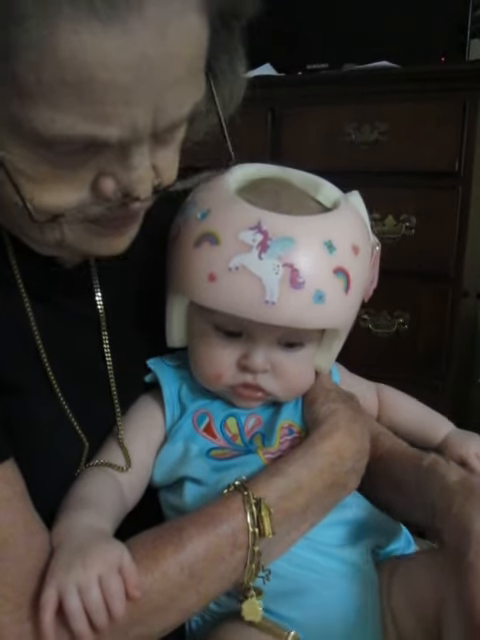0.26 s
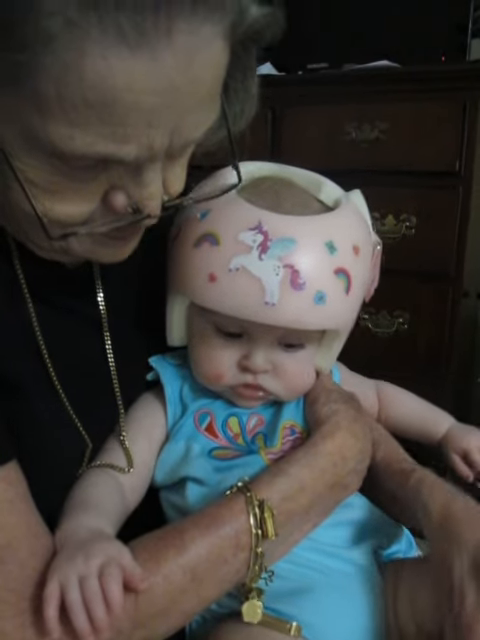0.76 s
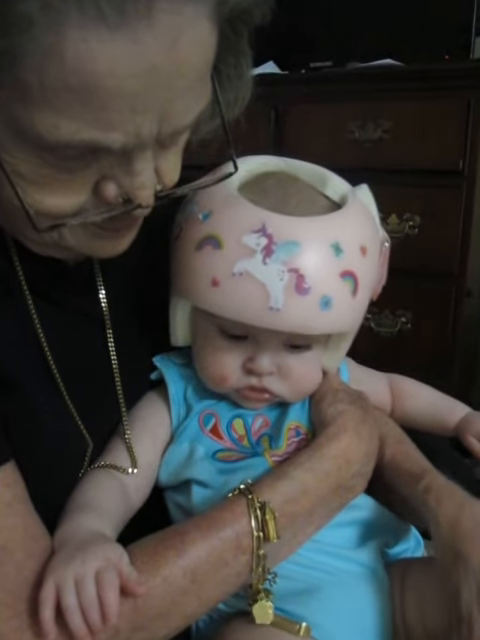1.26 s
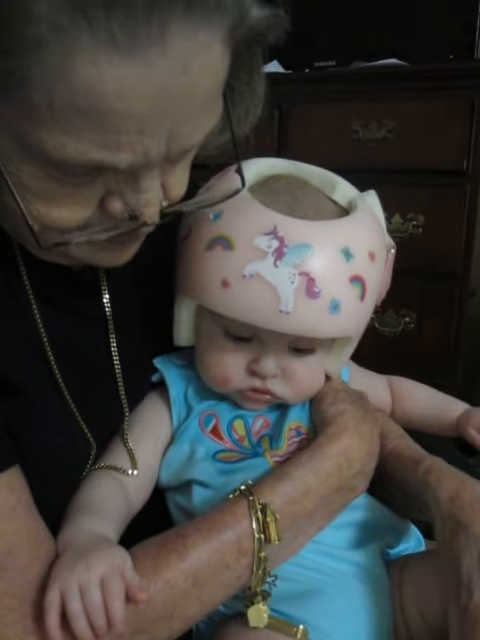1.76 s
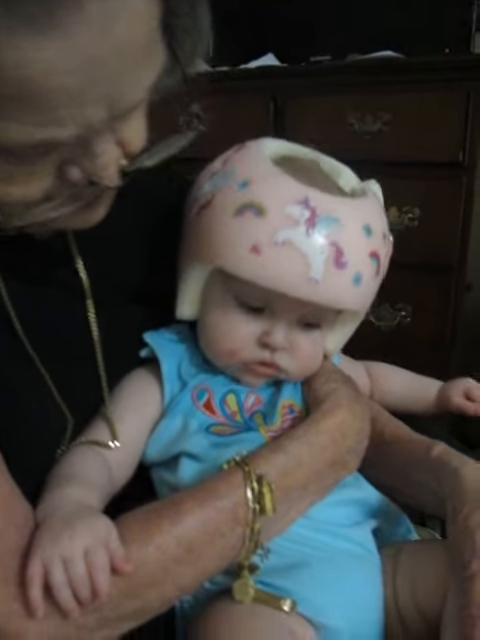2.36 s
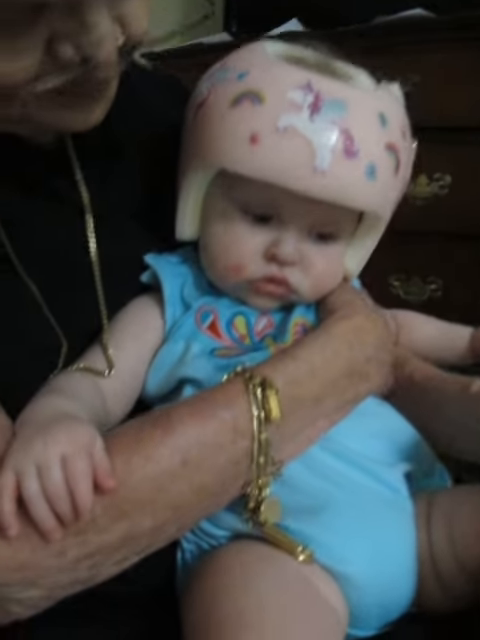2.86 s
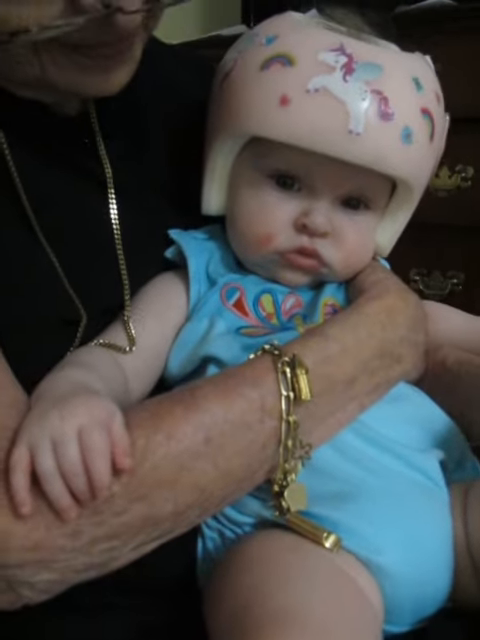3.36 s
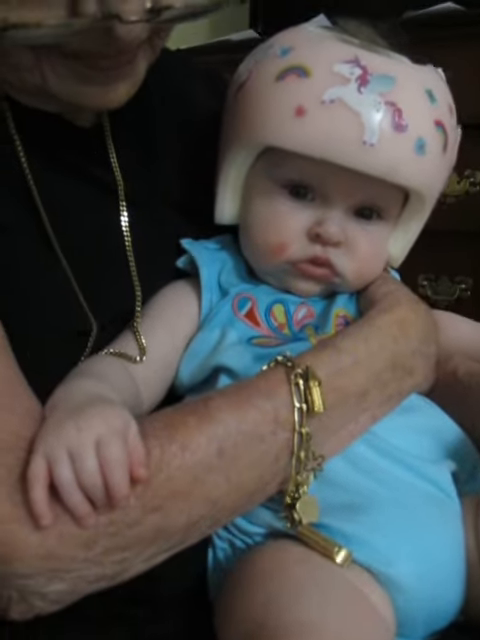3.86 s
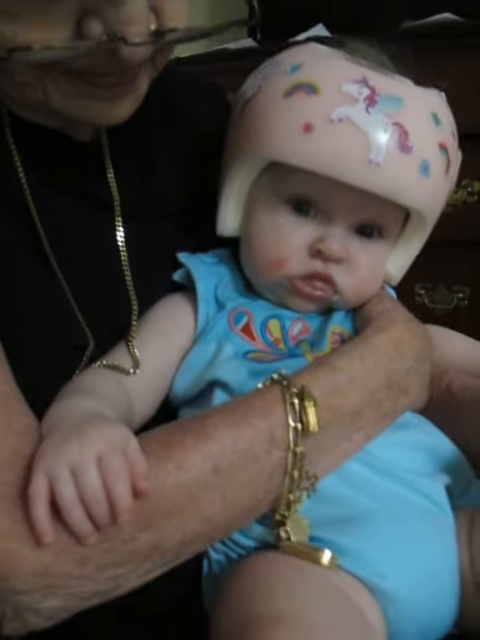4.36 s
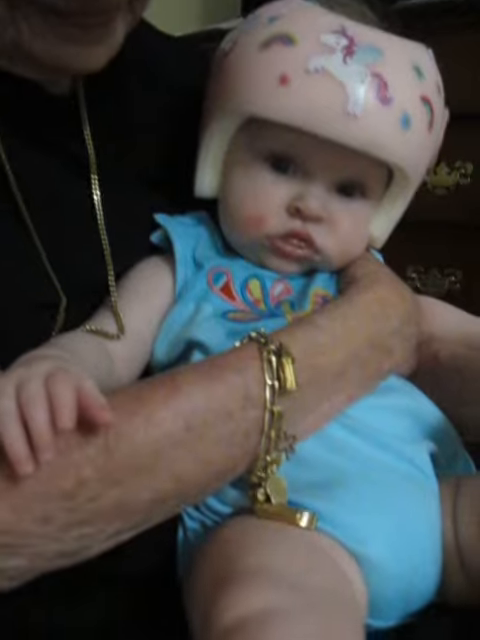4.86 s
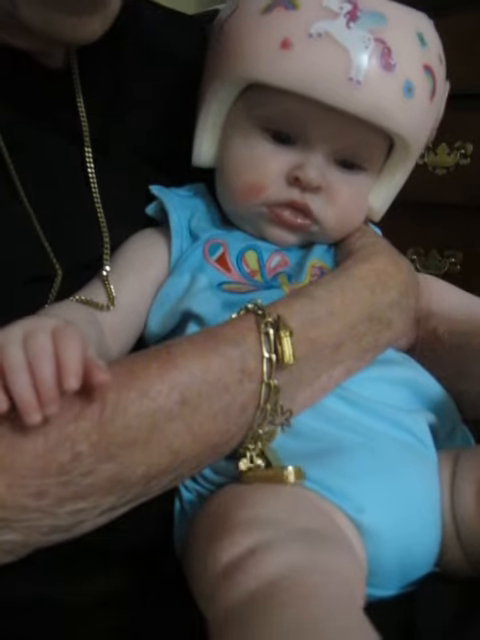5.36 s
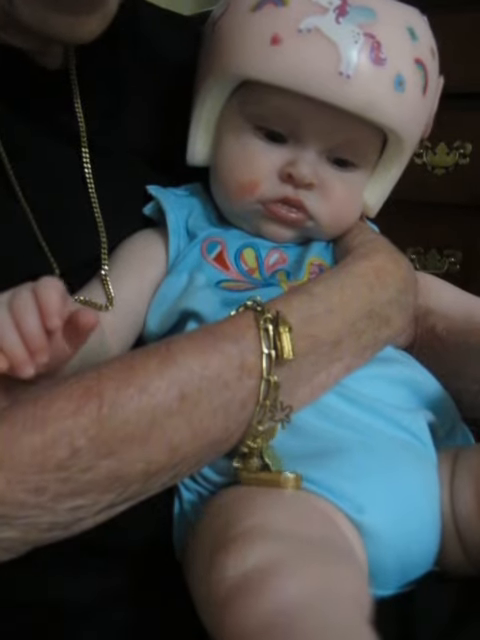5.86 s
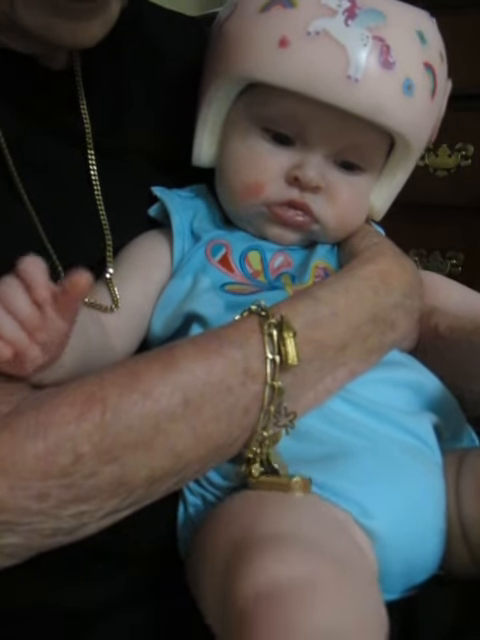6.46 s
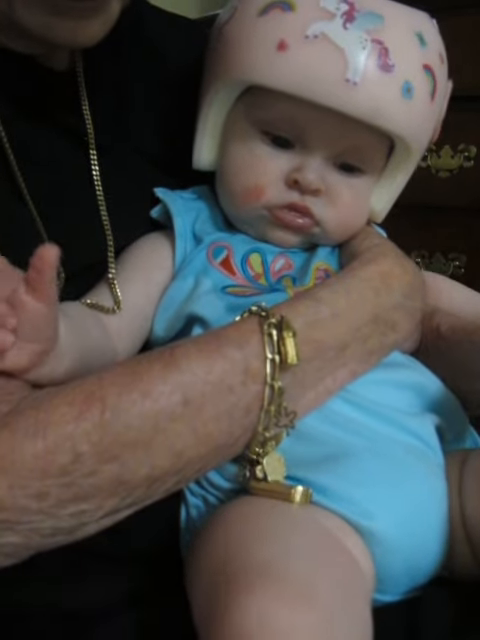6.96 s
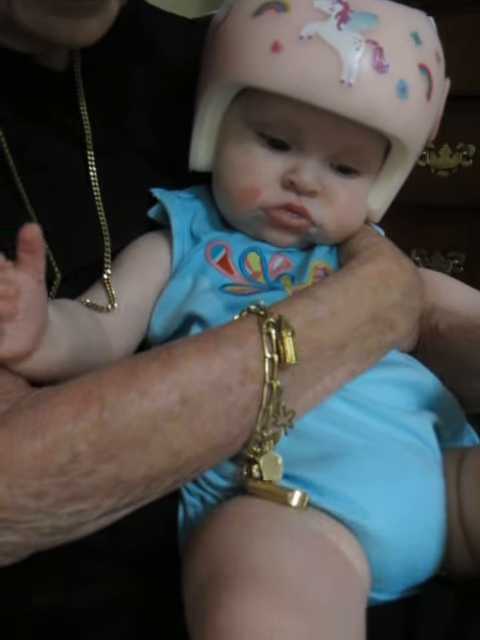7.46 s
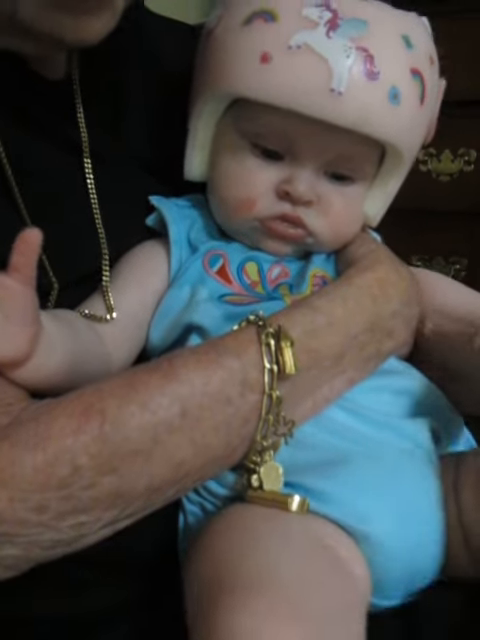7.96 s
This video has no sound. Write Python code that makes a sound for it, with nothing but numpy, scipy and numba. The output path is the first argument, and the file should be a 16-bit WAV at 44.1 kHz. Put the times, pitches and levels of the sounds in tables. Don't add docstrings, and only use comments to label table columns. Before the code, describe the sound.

Tiny metal bracelet charms clink and jingle in irregular bursts close to a handheld camera, over a steady low fan hum and faint motor whine.

```python
import sys
import numpy as np
from scipy import signal
from scipy.fft import rfft, irfft
from scipy.io import wavfile
from scipy.ndimage import uniform_filter1d
from numba import njit

SR = 44100
rng = np.random.default_rng(int(sys.argv[2]) if len(sys.argv) > 2 else 0)


def int16_out(signal):
    q = np.round(np.clip(np.atleast_2d(signal).T, -1, 1) * 32767)
    wavfile.write(sys.argv[1], SR, q.astype(np.int16))


def decibels_to_gain(level_db):
    exponent = np.asarray(level_db, float) / 20
    return 10 ** exponent


N = 361619


def level(x, db):
    return x * decibels_to_gain(db) / np.sqrt(np.mean(x ** 2))


def curve(s, values):
    return np.interp(np.arange(N) / SR, s, values)


def resonate(x, hz, width):
    return signal.lfilter(*signal.iirpeak(hz, hz / width, SR), x)


def band(hz, width):
    return level(resonate(rng.standard_normal(N), hz, width), 0)


def walk(rate):
    hold = int(SR / rate)
    steps = np.repeat(rng.standard_normal(N // hold + 1), hold)
    return 1.25 * uniform_filter1d(uniform_filter1d(steps, hold), hold)[:N]


def tone(hz, db, wobble, sway_db):
    phase = 2 * np.pi * hz * np.arange(N) / SR + wobble * walk(3) + rng.uniform(0, 2 * np.pi)
    return np.sqrt(2) * decibels_to_gain(db + sway_db * walk(4)) * np.sin(phase)


@njit
def ring(at, blow, pole, keep):
    out, z, p, k = np.zeros(N), 0j, 0j, 0
    for i in range(at[0], N):
        while k < len(at) and at[k] <= i:
            z, p, k = keep * z + blow[k], pole[k], k + 1
        out[i] = z.imag
        z = z * p if abs(z.real) + abs(z.imag) > 1e-9 else 0j
    return out


def strike(s, db, modes, t60=1., keep=.3, scatter_db=2., detune=.003, width=2000.):
    out, at = 0, (np.asarray(s) * SR).astype(np.int64)
    for hz, mode_db, factor in modes:
        pitch, strength, phase = rng.standard_normal((len(at), 3)).T
        decay = np.log(1000) / (factor * t60 * SR)
        pole = np.exp(2j * np.pi * hz * (1 + detune * pitch) / SR - decay)
        blow = decibels_to_gain(db + mode_db + scatter_db * strength) * np.exp(1j * phase)
        out = out + resonate(ring(at, blow, pole, float(np.clip(keep, 0, 1))), hz, width)
    return out


# pitch in Hz, level in dB per Hz.
AIR_COLOUR = [(45, -15), (75, -16), (100, -13.5), (290, -15.5), (400, -17.5), (700, -28), (1200, -32.5),
              (1750, -37.5), (3500, -38), (6000, -40), (9200, -39.5), (11500, -44), (14000, -61),
              (15800, -52)]


def air():
    hz, db = np.transpose(AIR_COLOUR)
    f = np.fft.rfftfreq(N, 1 / SR)
    shape = decibels_to_gain(np.interp(np.log(f + 1), np.log(hz), db))
    noise = irfft(rfft(rng.standard_normal(N)) * shape, N)
    upper = irfft(rfft(noise) * (f > 700), N)
    return noise * decibels_to_gain(-52.5 - 5.5) / upper.std()


# pitch in Hz, width in Hz, level in dB.
RIDGES = [(4970, 170, -70), (7070, 210, -74.5), (7300, 340, -82), (7930, 200, -79), (10240, 240, -66),
          (10740, 470, -76)]


def sensor():
    t, frame_hz = np.arange(N) / SR, 29.97
    beat = np.cos(2 * np.pi * frame_hz * t + 2.5 + .5 * walk(2))
    pulse = np.exp(1.25 * beat - .2 + .25 * walk(5))
    fade = decibels_to_gain(-.35 * t - 0.9)
    lines = decibels_to_gain(-73.5) * band(10190, 200.0) + decibels_to_gain(-72) * band(10050, 70.) + decibels_to_gain(-77) * band(10450, 60.)
    lines += decibels_to_gain(-76) * band(9915, 32.0) + decibels_to_gain(-72.5) * band(10255, 33.0) + decibels_to_gain(-88) * band(16000, 120.)
    ridges = sum(decibels_to_gain(db + walk(2.9)) * band(hz, width) for hz, width, db in RIDGES)
    return pulse * fade * lines + ridges


# multiple of the shaft speed, level in dB.
ORDERS_DB = [(2, -57), (5, -57), (6, -59.5), (8, -66.5), (9, -67.5), (10, -62), (11, -47.5), (12, -73.5),
             (14, -74)]
# pitch in Hz, level in dB.
DRONES = [(187, -53.5), (221, -54.5), (246, -54.5), (420, -68)]
# time in seconds, level in dB.
FAN_NEAR = [(0, -46.5), (2.3, -46), (3, -49), (5, -49.5), (8.2, -50.5)]
# time in seconds, level at half the shaft speed in dB, level at shaft speed in dB.
RUMBLE = [(0.0, -36.5, -54), (0.3, -42.5, -41), (2.31, -30, -42.5), (3.01, -37, -48.5), (3.11, -29, -63),
          (3.24, -40.5, -41), (4.5, -32, -41.5), (5.78, -37, -39.5), (6.17, -30, -51.5), (8.2, -37.5, -35)]


def fan():
    shaft_hz = 58.42
    near = curve(*np.transpose(FAN_NEAR))
    nearness = decibels_to_gain(near - near.mean())
    orders = sum(tone(k * shaft_hz, db, 0.45, 1.8 if k != 11 else .3) * nearness for k, db in ORDERS_DB)
    drones = sum(decibels_to_gain(db) * band(hz, 4.8) for hz, db in DRONES)
    s, half_db, first_db = np.transpose(RUMBLE)
    rumble = tone(shaft_hz / 2, 0, 1.3, 2.5) * decibels_to_gain(curve(s, half_db))
    rumble += tone(shaft_hz, 0, .5, 1.) * decibels_to_gain(curve(s, first_db))
    rumble += decibels_to_gain(-39.5) * band(12.7, 4.4) + decibels_to_gain(-38.5) * band(33.4, 2.66)
    rumble += decibels_to_gain(-48.5) * band(21.3, 7.2) + decibels_to_gain(-56.5) * band(39.7, 11.0)
    lull = np.sin(np.pi / 2 * np.minimum(np.arange(N, 0, -1) / (.012 * SR), 1))
    return orders + drones + rumble * lull


# pitch in Hz, level in dB.
WHINE = [
    [(1050, -82), (1120, -68.5), (1276, -66), (1314, -58.5), (1351, -61.5), (1389, -66), (1459, -66.5),
     (2476, -74.5), (2514, -78), (2552, -77), (2627, -76), (2745, -73), (2772, -75)],
    [(1120, -69.5), (1238, -63.5), (1276, -61.5), (1314, -60), (1351, -58), (1432, -69), (1459, -69),
     (2514, -76.5), (2552, -75), (2589, -75), (2783, -69), (2821, -73), (2859, -77), (2896, -74)],
    [(1357, -64), (1443, -69), (1480, -66.5), (1513, -64), (1620, -69), (2046, -74), (2799, -78),
     (2902, -77), (3149, -78), (3225, -69.5)],
]
# start in seconds, state number.
STATES = [(0, 2), (.09, 0), (2.42, 1), (5.1, 2), (5.24, 1), (5.4, 2), (5.47, 1), (5.55, 2), (5.76, 1),
          (6.47, 2), (6.53, 1), (6.59, 2), (6.84, 1), (7.02, 2), (7.27, 1), (7.86, 2)]
# pitch in Hz, width in Hz.
HISS_BANDS = [(1350, 300), (1600, 300), (1860, 80), (2050, 300), (2410, 130), (2810, 190), (3200, 180),
              (3720, 100), (4240, 110), (4800, 300), (5350, 400), (6450, 400), (3950, 200), (8800, 3500)]
# level in states 0, 1 and 2, all in dB.
HISS_DB = [(-63, -61, -62.5), (-84, -85, -66.5), (-75.5, -74, -79), (-81, -88, -91), (-84, -71.5, -100),
           (-69, -70.5, -69), (-100, -98, -67), (-71.5, -76.5, -77), (-70, -68, -72), (-81, -84, -68.5),
           (-73, -71.5, -87), (-84, -87, -67), (-76.5, -72, -93), (-96, -80, -62.5)]


def motor():
    t, motor_hz = np.arange(N) / SR, 36.85
    s, state = np.transpose(STATES)
    now = state[np.searchsorted(s, t, "right") - 1]
    share = [uniform_filter1d(1. * (now == k), size=4000) for k in range(3)]
    whine = sum(share[k] * tone(hz, db, 0.18 + 3.26 * (k == 2), 2.16)
                for k in range(3) for hz, db in WHINE[k])
    hiss = 0
    for (hz, width), levels_db in zip(HISS_BANDS, HISS_DB):
        noise = level(resonate(band(hz, width), hz, 2 * width), 0)
        loudness = sum(part * decibels_to_gain(db) for part, db in zip(share, levels_db))
        hiss = hiss + noise * decibels_to_gain(walk(3.05)) * loudness
    throb = 1 + .5 * np.cos(2 * np.pi * motor_hz * t)
    tick_times = np.arange(.018, N / SR, .2167)
    ticks = strike(tick_times, -49.5, [(574.4, .1, 0.19)], detune=0.008, width=180.0)
    return whine + throb * hiss + ticks


# start in seconds, level in dB, tilt in dB per octave (plus is brighter).
KNOCKS = [(2.4165, -44, -1), (2.4187, -31, 2), (2.4203, -32.5, 0.5), (2.4275, -45, 2), (2.7625, -48, -5),
          (2.916, -47, -3), (3.431, -51, -3), (3.971, -53, 7), (4.996, -50, -5), (5.549, -50, 3),
          (6.121, -52, 3), (6.722, -52, -7), (6.727, -50, -4), (7.81, -57, -7)]
# pitch in Hz, level in dB, ring time in seconds.
HOUSING_MODES = [(284, -6, 0.044), (520, 1, 0.029), (856, 7, 0.019), (1140, 4.5, 0.013), (1520, 3, 0.018),
                 (1880, 4, 0.011), (2370, 3.5, 0.019), (2880, -1, 0.015), (3370, -1, 0.0075),
                 (4700, -10, 0.0096), (5660, -10, .008), (7000, -19, .007)]


def knocks():
    s, db, tilt_db = np.transpose(KNOCKS)
    out = 0
    for hz, mode_db, t60 in HOUSING_MODES:
        late = .0009 * np.log2(5000 / hz)
        tilted_db = db + tilt_db * np.log2(hz / 1500)
        out = out + strike(s + late, tilted_db, [(hz, mode_db, t60)],
                           detune=0.019, scatter_db=0.5, width=1.04 * hz)
    return out


# middle in seconds, half length in seconds, rustle in dB, chatter in dB.
SHAKES = [(.2, .3, -69, -62), (2.12, 0.13, -67, -64), (4.404, 0.16, -68, -53), (4.727, 0.18, -64, -55),
          (5.037, 0.05, -55.5, -48), (5.263, 0.058, -55, -42), (5.847, 0.22, -65, -52),
          (6.169, 0.052, -56.5, -44), (6.381, .06, -58, -46), (6.75, 0.12, -61, -44),
          (7.822, 0.11, -66, -53), (8.067, 0.035, -71, -54)]


def rustle():
    size_db = 2.5 * np.minimum(rng.exponential(size=N), 3.5)
    grains = (rng.random(N) < 900 / SR) * decibels_to_gain(size_db)
    smear = signal.lfilter([1], [1, -.99], grains) * rng.standard_normal(N)
    colour = resonate(smear, 8000.0, 3300.0) + resonate(smear, 4500.0, 2500.)
    colour += decibels_to_gain(-22) * resonate(smear, 12000.0, 5000.)
    t, rest_db = np.arange(N) / SR, -65
    motion = decibels_to_gain(rest_db) + sum(decibels_to_gain(db) * np.exp(-((t - s) / half) ** 2) for s, half, db, _ in SHAKES)
    return level(colour, 0) * motion


def chatter(count):
    rows = [(s + half * (2 * u - 1), db - 8 * v)
            for s, half, _, db in SHAKES for u, v in rng.random((count, 2))]
    return np.clip(np.transpose(sorted(rows)), [[0], [-99]], [[N / SR], [0]])


def loose(modes, less_db):
    s, db = chatter(count=3)
    return strike(s, db + less_db, modes, detune=.004)


# start in seconds, level in dB.
SNAPS = [(.387, -56), (.4232, -43),  (.8925, -52), (1.2697, -54), (2.0305, -56), (2.791, -46),
         (4.0567, -52), (4.3447, -47), (4.5294, -44), (4.5528, -46), (4.7737, -43), (4.8496, -54),
         (4.9748, -54), (5.035, -52), (5.2, -48), (5.224, -37), (5.2473, -45), (5.2535, -47), (5.2577, -44),
         (5.2641, -42), (5.268, -48), (5.2723, -43), (5.2805, -42), (5.2875, -47), (5.309, -52),
         (5.347, -46), (5.371, -44), (5.44, -54), (5.5235, -50), (5.5964, -52), (5.775, -41), (5.7995, -51),
         (5.817, -49), (5.835, -51), (5.8428, -36), (5.851, -43), (5.8975, -54), (5.9212, -44), (5.99, -50),
         (6.201, -54), (6.3354, -43), (6.3445, -46), (6.36, -44), (6.3808, -47), (6.3855, -50),
         (6.3918, -42), (6.399, -47), (6.4085, -50), (6.4125, -49), (6.4175, -51), (6.462, -48),
         (6.5492, -41), (6.7019, -48), (6.7236, -50), (6.7302, -46), (6.7775, -50), (6.7828, -36),
         (6.7955, -43), (7.7946, -53), (8.0435, -46), (8.051, -53)]
# pitch in Hz, level in dB, ring time in seconds.
SNAP_MODES = [(4300, -3, .003), (5700, -9, .003), (9250, 9.5, .003), (11500, -3, .003), (13500, -5, .003),
              (15600, -7, .003)]


def chain_snaps():
    snaps = strike(*np.transpose(SNAPS), SNAP_MODES, detune=.03, width=4000.)
    return snaps + sum(loose(SNAP_MODES, -7) for _ in range(3))


# start in seconds, level in dB.
LINKS = [(0.181, -39), (0.2207, -36), (0.423, -34), (2.1212, -37), (4.3448, -36), (4.6383, -38),
         (4.7738, -38), (5.0159, -37), (5.186, -38), (5.1907, -36), (5.2091, -37), (5.2535, -32),
         (5.2863, -37), (5.767, -40), (5.8033, -34), (5.9211, -38), (6.3354, -27.5), (6.3491, -27),
         (6.356, -32), (6.3634, -37), (6.3808, -29), (6.5493, -37), (6.697, -41), (6.705, -36),
         (6.7236, -36), (6.8593, -36)]
# pitch in Hz, level in dB, ring time in seconds.
LINK_MODES = [(10940, -24, 0.023), (10250, -0.5, 0.0049), (10800, -13, 0.024)]


def chain_links():
    return strike(*np.transpose(LINKS), LINK_MODES, detune=.012) + loose(LINK_MODES, -2)


# start in seconds, level in dB.
BEADS = [
    [(0.4237, -37), (1.2702, -43), (2.0305, -54), (4.0567, -56), (4.3454, -45), (4.437, -54), (4.5295, -56),
     (4.5536, -47), (4.7741, -38), (4.8, -54), (4.975, -53), (5.2, -49), (5.2238, -43), (5.2646, -46),
     (5.2833, -42), (5.3099, -48), (5.372, -48), (5.7761, -45), (5.788, -55), (5.843, -51), (5.9219, -33),
     (5.946, -48), (6.3919, -49), (6.462, -54), (6.7307, -52), (6.758, -47), (6.7833, -40), (6.9025, -52),
     (7.5185, -56), (7.794, -52)],
    [(0.4237, -47), (1.2702, -55), (2.0305, -56), (4.3454, -52), (4.5536, -52), (4.7741, -48),
     (5.2238, -50), (5.2473, -52), (5.2585, -45), (5.2646, -19), (5.2723, -42), (5.2833, -46), (5.29, -50),
     (5.81, -52), (5.9219, -45), (6.3445, -43), (6.3602, -50), (6.55, -40), (6.7307, -46), (6.7833, -47),
     (6.9025, -54), (7.847, -55)],
    [(0.4237, -58), (5.228, -47), (5.2646, -47), (5.2833, -44), (5.7985, -48), (5.8027, -43), (5.843, -52),
     (5.9906, -54), (6.3445, -39), (6.3602, -53), (6.3919, -51), (6.418, -52), (6.55, -39), (6.575, -54)],
]
# pitch in Hz, level in dB, ring time in seconds.
BEAD_MODES = [
    [(12495, 0, .021), (12700, -10, .01)],
    [(13930, -2, .017), (14170, -5, .03)],
    [(15130, -1, .022), (15170, -16, .1)],
]


def beads():
    out = 0
    for hits, modes in zip(BEADS, BEAD_MODES):
        out = out + strike(*np.transpose(hits), modes, keep=0.41, detune=.001, scatter_db=3.0)
        out = out + loose(modes, -27)
    return out


# start in seconds, level in dB.
TUBE = [(0.4233, -40), (4.354, -44), (4.5381, -43), (4.553, -46), (4.781, -45), (5.2537, -39),
        (5.2583, -40), (5.2632, -40), (5.2723, -39), (5.775, -39), (5.817, -45), (5.843, -36),
        (5.8511, -45), (5.9035, -45), (5.9353, -48), (6.7307, -40), (6.783, -35), (6.7956, -44),
        (6.8034, -49), (8.0441, -43), (8.051, -45)]
# pitch in Hz, level in dB, ring time in seconds.
TUBE_MODES = [(4720, -0.5, 0.023), (5100, -6, 0.0087)]
# start in seconds, level in dB.
CLASP = [(5.2537, -46), (5.2655, -41), (5.9035, -37), (5.921, -48), (5.99, -54), (6.548, -37),
         (6.7836, -52)]
# pitch in Hz, level in dB, ring time in seconds.
CLASP_MODES = [(3220, -1, .027)]


def tube_and_clasp():
    tube = strike(*np.transpose(TUBE), TUBE_MODES, scatter_db=0.5)
    return tube + strike(*np.transpose(CLASP), CLASP_MODES, scatter_db=.5, width=1400.0)


# start in seconds, level in dB, ring time in seconds.
LOW_COIN = [(.4236, -46, .07), (.8925, -51, .05), (1.27, -48, .04), (4.0576, -44, .05), (4.7739, -49, .05),
            (4.78, -40, .05), (4.975, -46, .05), (5.2239, -31, 0.046), (5.2535, -46, .06),
            (5.263, -34, .05), (5.2762, -42, .05), (5.2828, -41, .03), (5.817, -43, .04),
            (5.8265, -41, .04), (5.8435, -45, .04), (5.8511, -45, .04), (6.3354, -42, .015),
            (6.345, -46, .06), (6.358, -46, .05), (6.3923, -40, .06), (6.5494, -42, .015),
            (6.7836, -53, .05), (6.7956, -52, .05), (7.5191, -45, .03), (7.7946, -43, .03)]
# start in seconds, level in dB, ring time in seconds.
HIGH_COIN = [(1.236, -57, .03), (4.372, -41, .015), (4.5543, -38, .02), (4.7739, -49, .05),
             (4.781, -52, .05), (5.2632, -44, .05), (5.371, -30, 0.018), (5.376, -45, .016),
             (5.654, -40, .02), (5.7754, -47, 0.19), (5.8265, -44, .05), (5.8511, -44, .05),
             (5.903, -33.5, 0.056), (5.9447, -44, .02), (6.3916, -28, 0.076), (6.401, -33, .04),
             (6.462, -32, 0.022), (6.7304, -45, .04), (6.7579, -43, .02), (6.783, -46, .03),
             (6.7956, -38, .03), (6.8034, -44, .03), (6.9032, -45, .04)]
# pitch in Hz, level in dB, ring time factor.
COIN_MODES = [
    [(6945, 0, 1)],
    [(7290, 0, 1), (7420, -10, .6)],
]


def coins():
    out = 0
    for coin, modes in zip((LOW_COIN, HIGH_COIN), COIN_MODES):
        s, db, t60 = np.transpose(coin)
        out = out + strike(s, db, modes, t60, keep=.5, scatter_db=0.5)
    return out


# start in seconds, level in dB, ring time in seconds.
DISC = [(0.4236, -27, 0.016), (4.5543, -29, 0.0093), (4.7725, -34, 0.041), (4.782, -23, 0.019),
        (5.2237, -22, 0.016), (5.2473, -37, 0.03), (5.2537, -27, .06), (5.2577, -22, 0.04),
        (5.262, -24, 0.056), (5.2723, -23, 0.015), (5.282, -23, 0.015), (5.372, -23, 0.018),
        (5.3765, -31, .01), (5.6553, -20.5, 0.0068), (5.775, -30, 0.14), (5.817, -28, 0.02),
        (5.8205, -22, 0.033), (5.8265, -25, 0.029), (5.843, -19.5, 0.027), (5.8511, -25, 0.02),
        (5.8575, -37, .03), (5.904, -29, 0.034), (5.9325, -30, .01), (5.9353, -25, 0.011),
        (5.9732, -27.5, 0.017), (5.9906, -25.5, 0.019), (6.3575, -30, 0.029), (6.3923, -18.5, 0.064),
        (6.4007, -21, 0.053), (6.412, -24, 0.03), (6.463, -28, 0.022), (6.5494, -26.5, 0.025),
        (6.7304, -29, 0.053), (6.7831, -17, 0.025), (6.7955, -19, 0.022), (6.8034, -33, .015),
        (6.9032, -32, 0.029), (8.0435, -30, .025)]
# start in seconds, level in dB.
TAPS = [(4.0566, -32), (4.345, -41), (4.3534, -36), (4.372, -31.5), (4.529, -36), (4.975, -35),
        (5.036, -36), (5.1085, -34), (5.2009, -33), (5.233, -25), (5.285, -29), (5.3466, -37), (5.441, -29),
        (5.675, -36), (5.9214, -29), (5.9447, -31), (6.169, -35), (6.3353, -40), (6.3804, -39),
        (6.506, -34), (6.7579, -35), (7.124, -42), (7.519, -37), (7.7944, -32), (7.848, -37),
        (8.084, -35.5)]
# start in seconds, level in dB.
GRAZES = [(.163, -45), (.891, -49), (1.236, -45), (4.538, -36), (4.626, -45), (4.85, -46), (5.012, -43),
          (5.078, -47), (5.294, -46), (5.308, -45), (5.3255, -42), (5.3575, -50), (5.416, -46),
          (5.423, -47), (5.523, -49), (5.596, -48), (5.633, -42), (5.788, -37), (5.8, -34), (5.835, -35),
          (5.8645, -39), (5.872, -42), (5.878, -39), (5.889, -43), (6.2015, -39), (6.3471, -35),
          (6.4298, -36), (6.439, -39), (6.4454, -36), (6.4824, -42), (6.518, -44), (6.534, -44),
          (6.6185, -41), (6.645, -42), (6.652, -44), (6.723, -38), (6.779, -39), (6.8105, -35),
          (6.8165, -43), (7.45, -42), (7.54, -45), (7.8794, -42), (8.051, -33), (8.068, -39), (8.194, -52)]
# pitch in Hz, level in dB, ring time factor.
DISC_MODES = [(8200, -6, 1.), (8095, -8, 1.05), (8370, -11, .55), (8750, -12, .4), (9150, -15, .3)]


def flat_charm():
    s, db, t60 = np.transpose(sorted(DISC + [(*tap, .024) for tap in TAPS]))
    free_db = 4 * np.log2(np.clip(t60 / .022, .7, 3))
    out = strike(s, db + free_db / 4, DISC_MODES[:2], t60, scatter_db=1.5, detune=.0015, width=1300.)
    out += strike(s, db - free_db, DISC_MODES[2:], t60, width=1500.)
    crack = [(9100, 5.0, 0.0034), (5750, -8, 0.0033), (3350, -7.5, 0.0038), (13000, -10, .003)]
    out += strike(s, db - 14.5, crack, detune=0.028, scatter_db=3.0, width=4500.0)
    out += sum(strike(s, db - 38, modes, scatter_db=4.0, detune=.001) for modes in BEAD_MODES[:2])
    out += strike(*np.transpose(GRAZES), DISC_MODES, 0.024)
    return out + strike(*chatter(count=5), DISC_MODES, .03)


def bracelet():
    return chain_snaps() + chain_links() + beads() + tube_and_clasp() + coins() + flat_charm()


def room_echo(x):
    t = np.arange(4000) / SR
    tail = rng.standard_normal(len(t)) * np.exp(-np.log(1000) * t / 0.044) * (t > .002)
    return signal.fftconvolve(x, level(tail, -12.0) / np.sqrt(len(t)))[:N]


def scene():
    background = air() + sensor() + fan() + motor()
    taps, hits = knocks(), bracelet()
    echo = room_echo(hits + decibels_to_gain(-4) * taps)
    return (background + taps + rustle() + hits + echo)[None]


def roll_off(x):
    return signal.sosfilt(signal.butter(12, 16500, fs=SR, output="sos"), x)


def record(dry):
    top_hz = 15830
    cut = signal.sosfilt(signal.ellip(10, .3, 30, top_hz, fs=SR, output="sos"), dry)
    return roll_off(cut)


dry = scene()
out = record(dry)
int16_out(out)
```